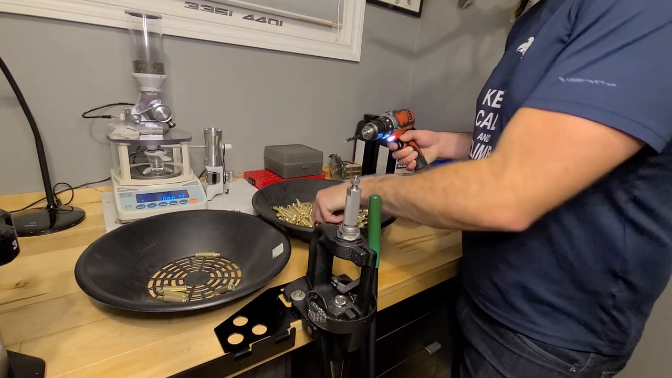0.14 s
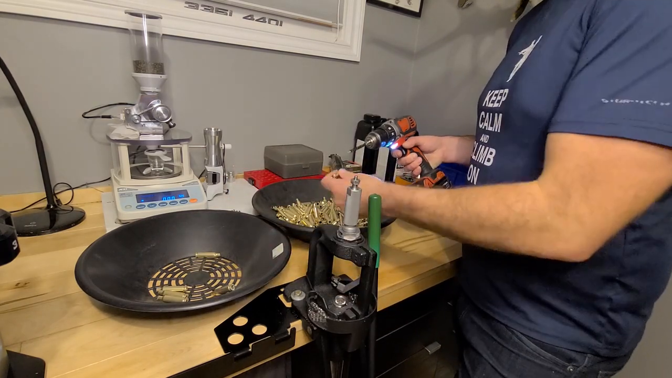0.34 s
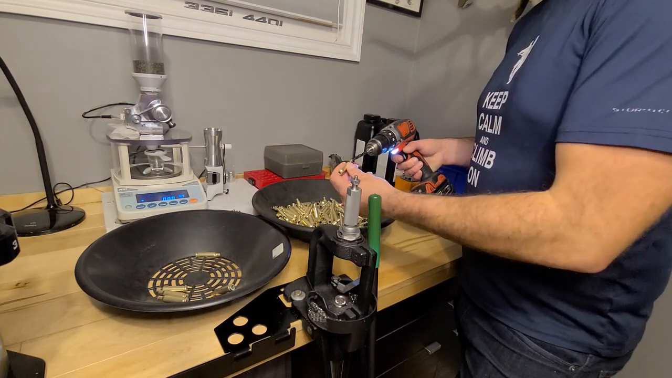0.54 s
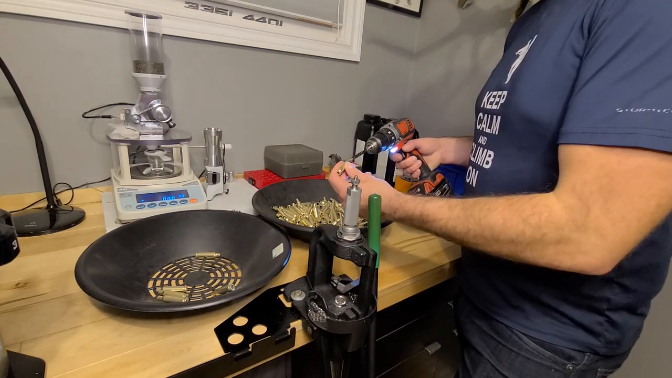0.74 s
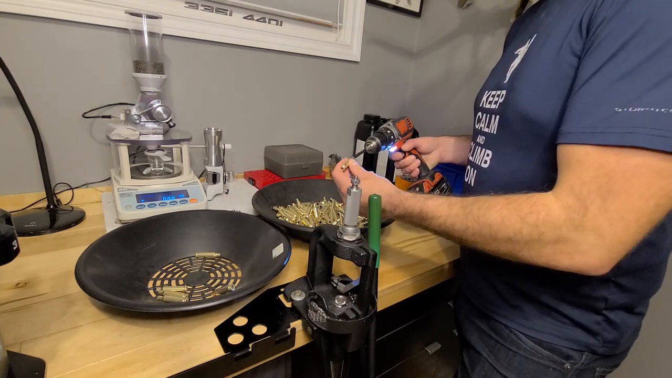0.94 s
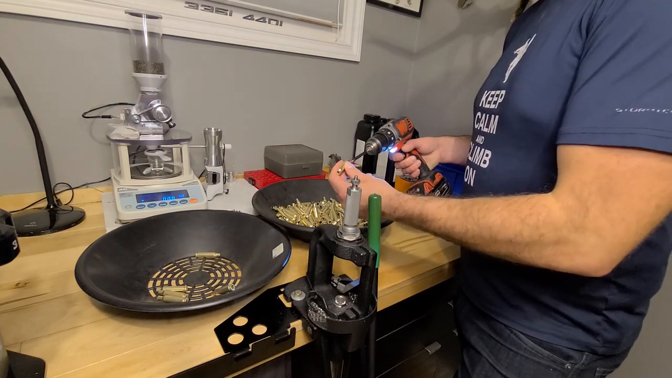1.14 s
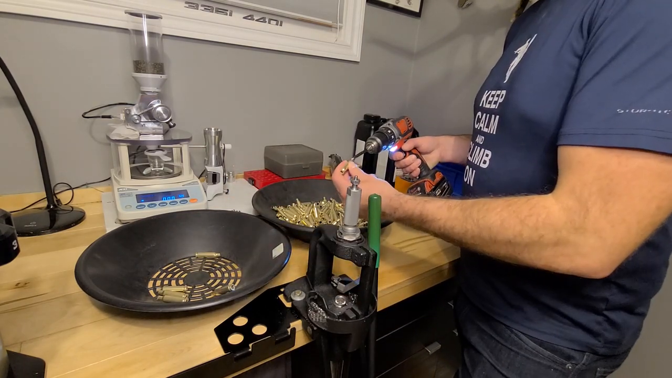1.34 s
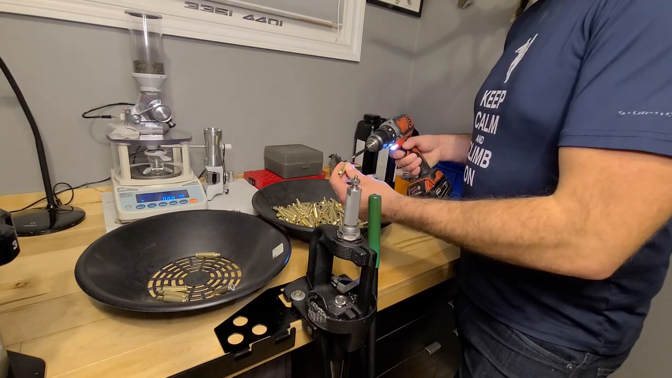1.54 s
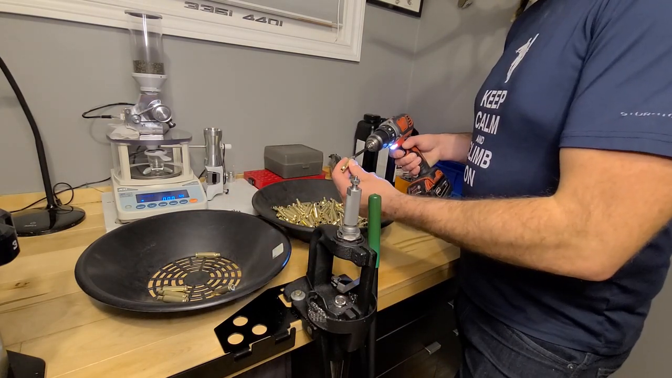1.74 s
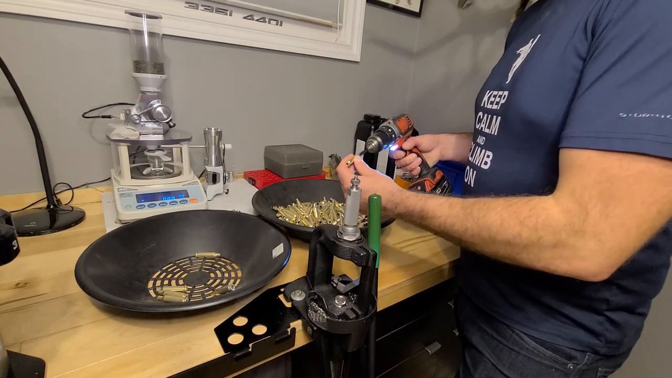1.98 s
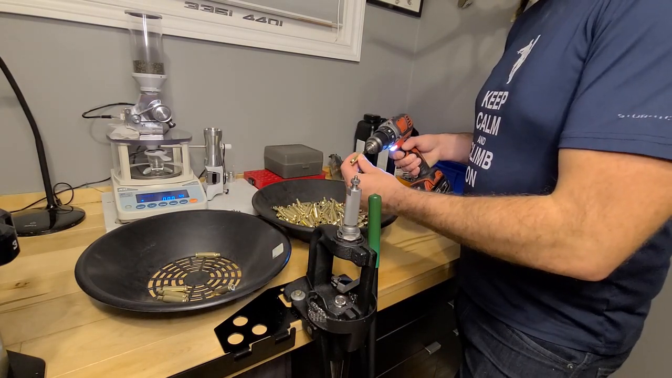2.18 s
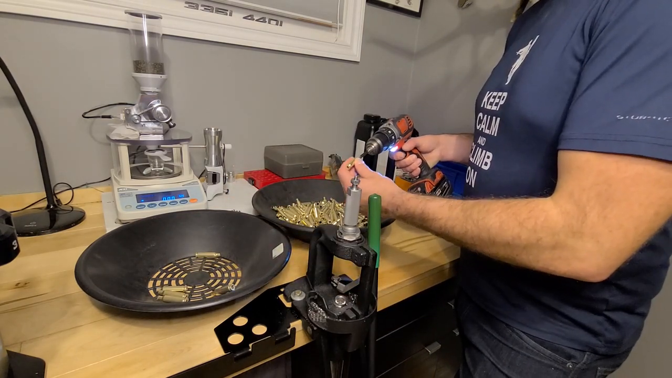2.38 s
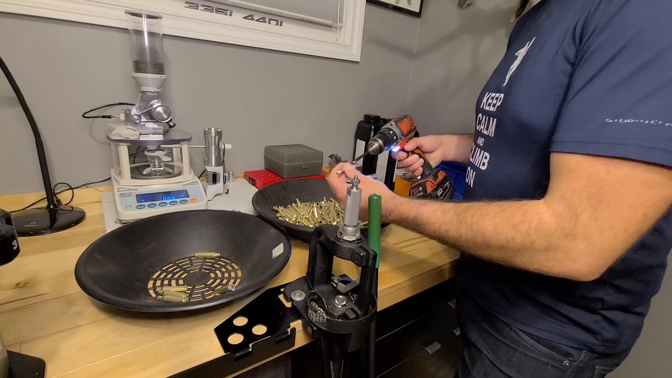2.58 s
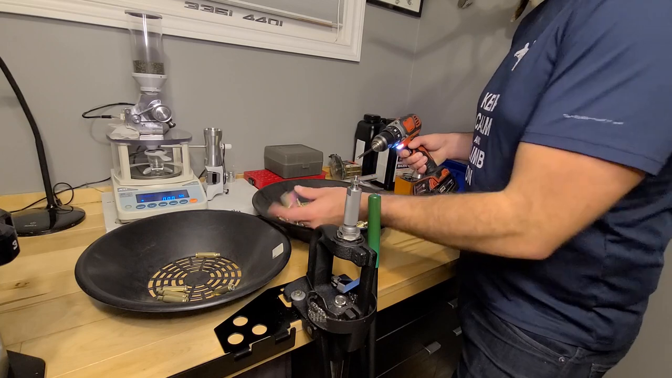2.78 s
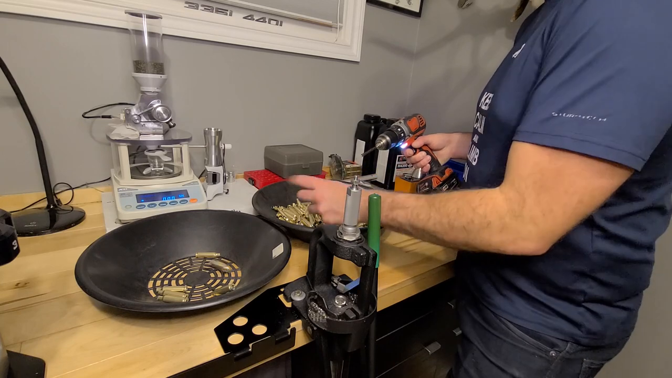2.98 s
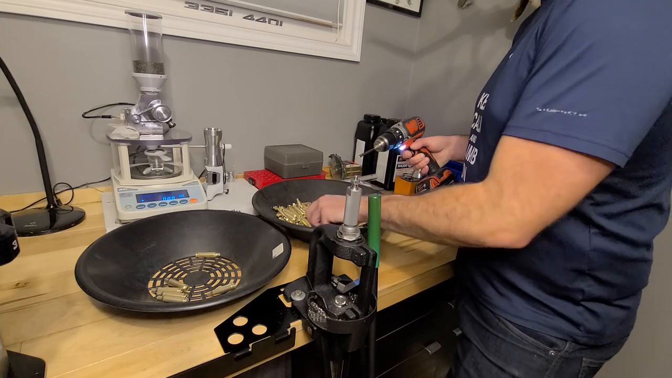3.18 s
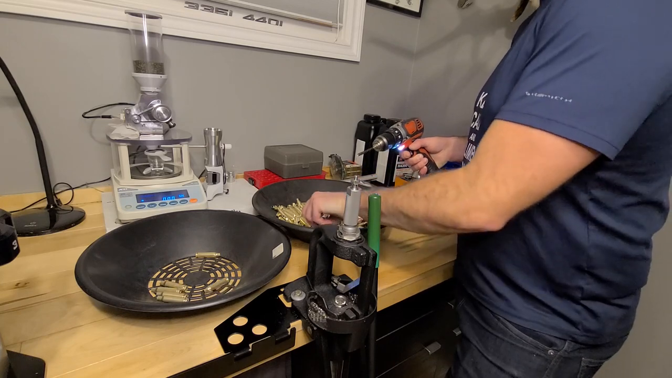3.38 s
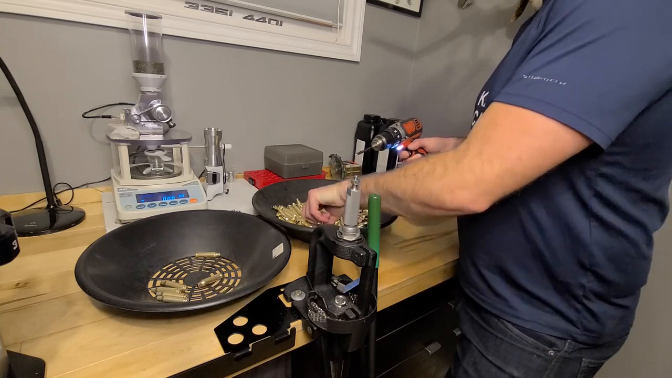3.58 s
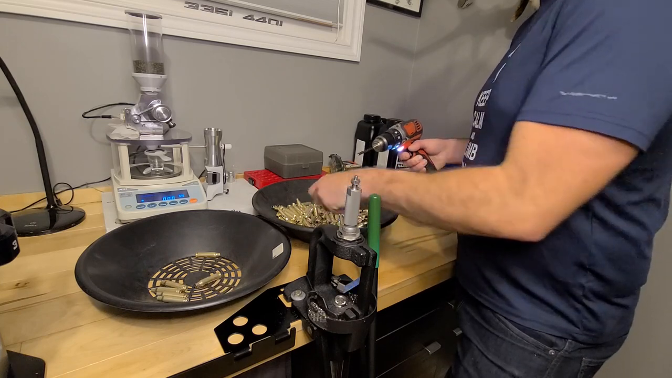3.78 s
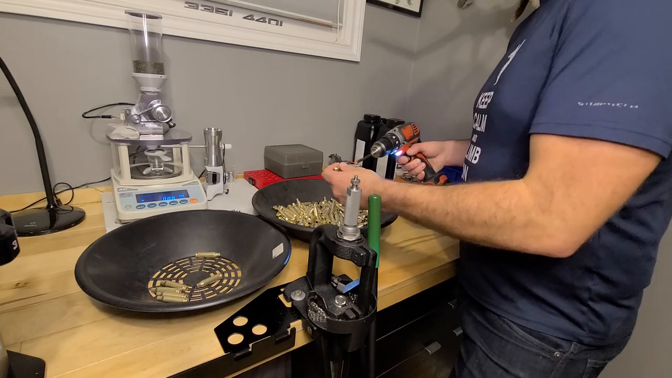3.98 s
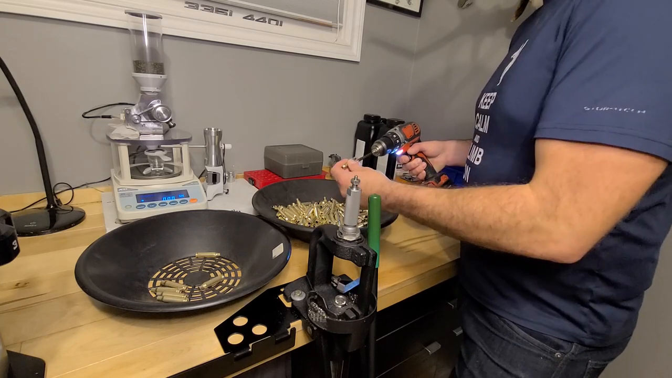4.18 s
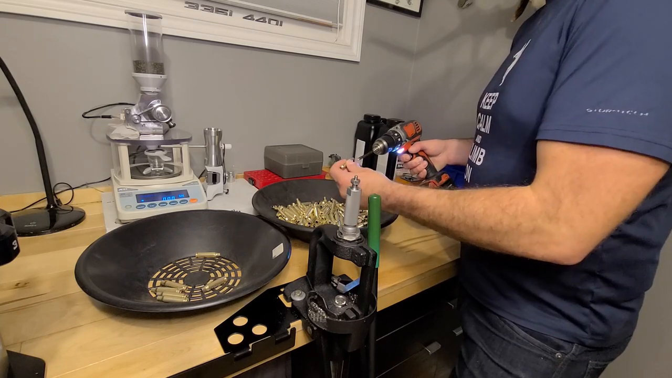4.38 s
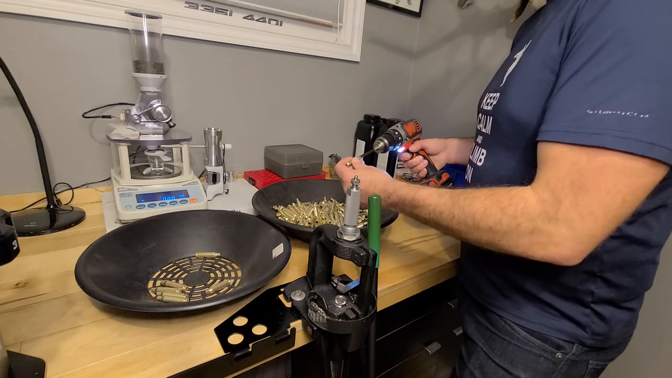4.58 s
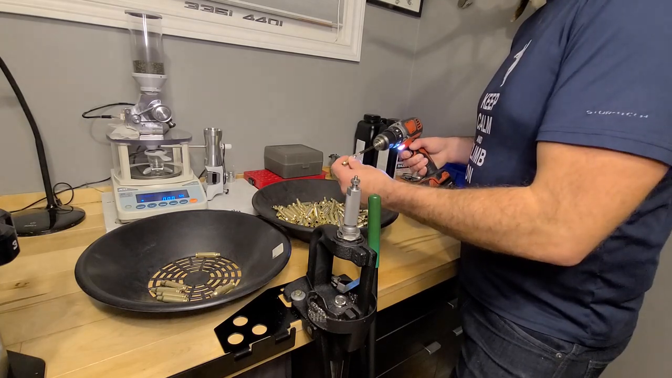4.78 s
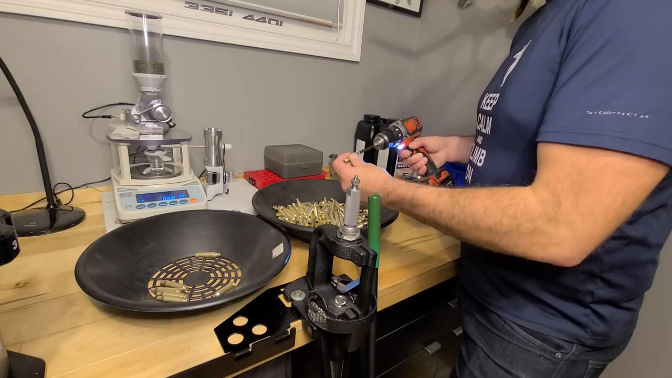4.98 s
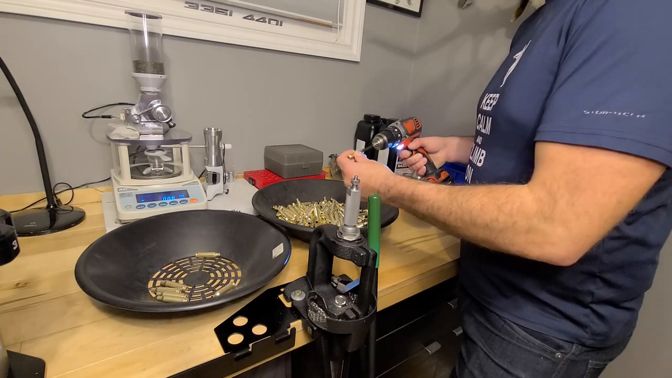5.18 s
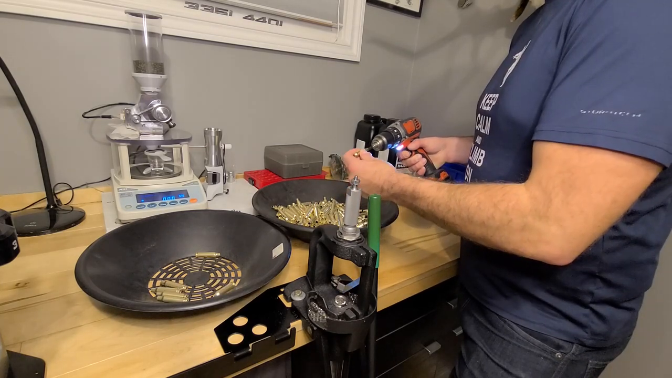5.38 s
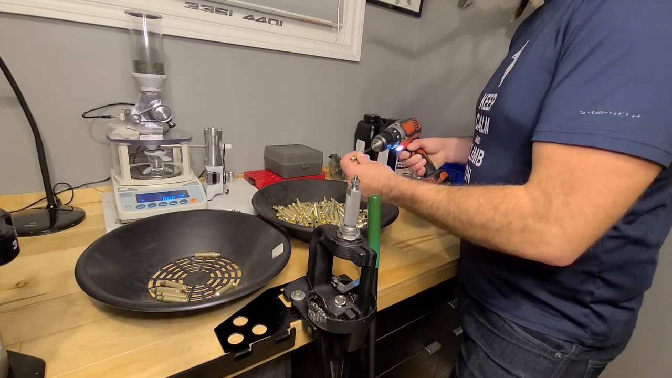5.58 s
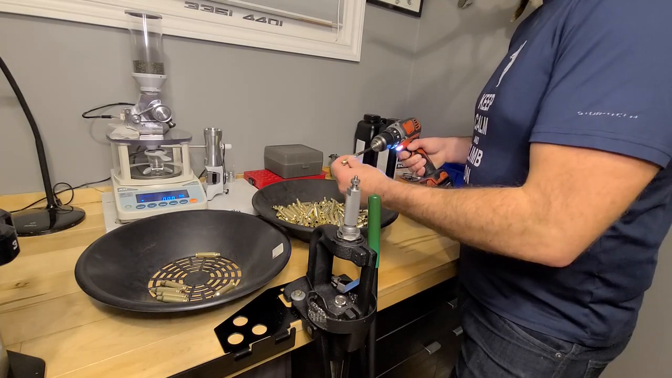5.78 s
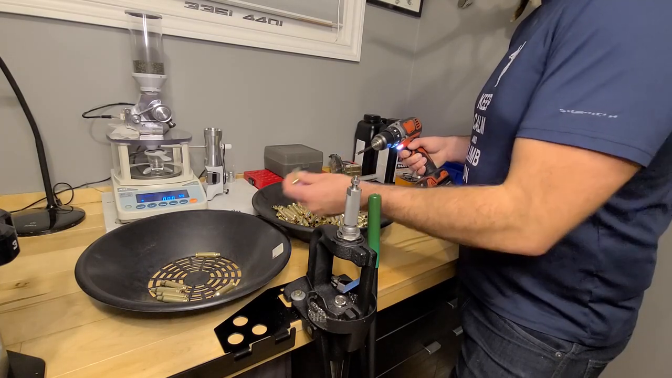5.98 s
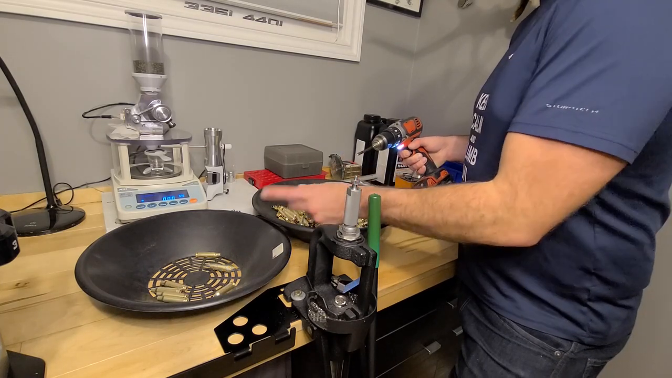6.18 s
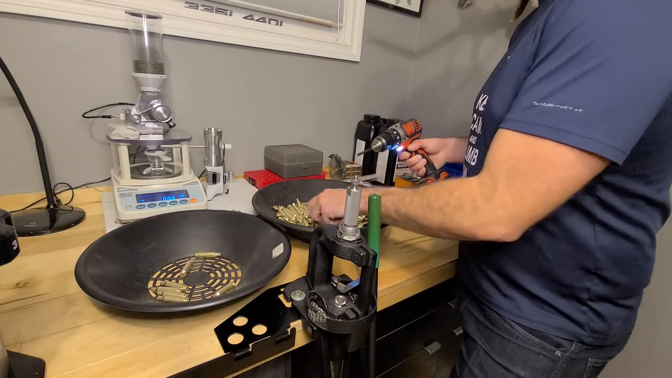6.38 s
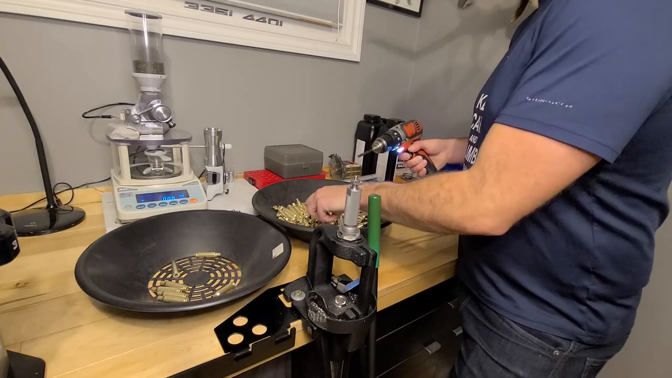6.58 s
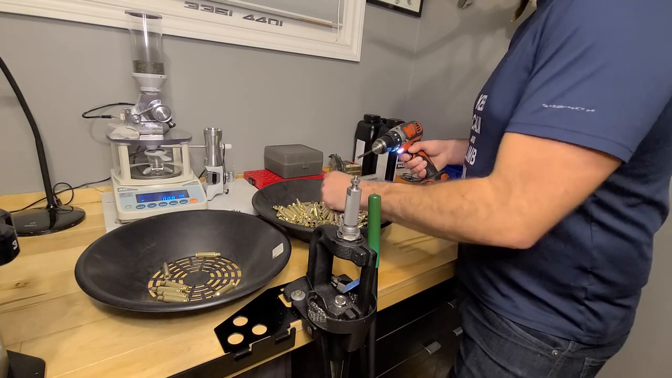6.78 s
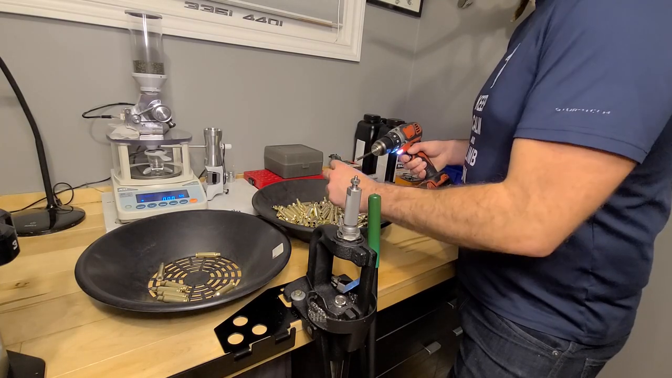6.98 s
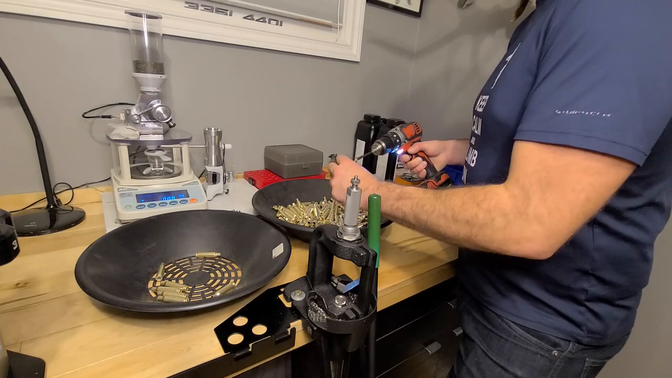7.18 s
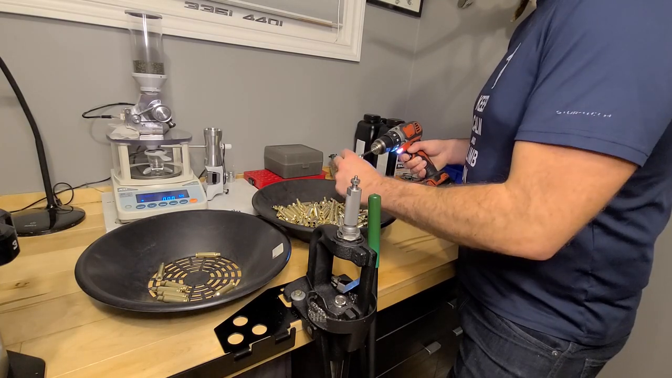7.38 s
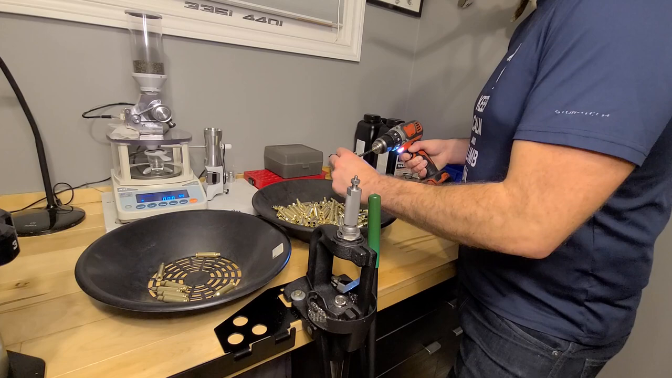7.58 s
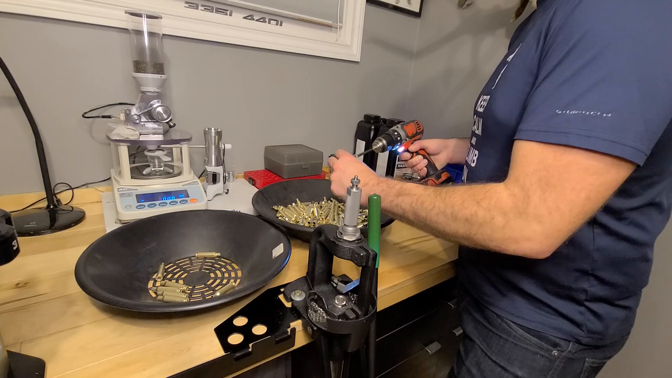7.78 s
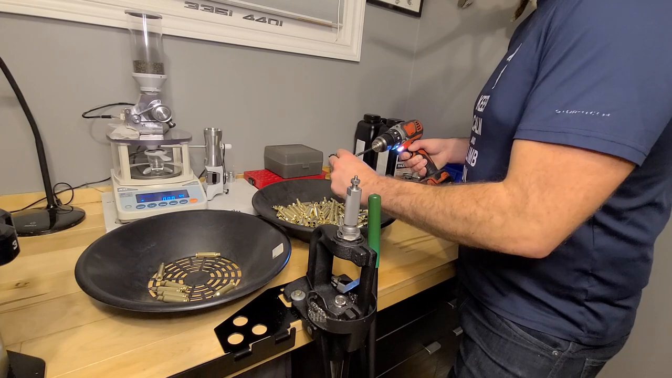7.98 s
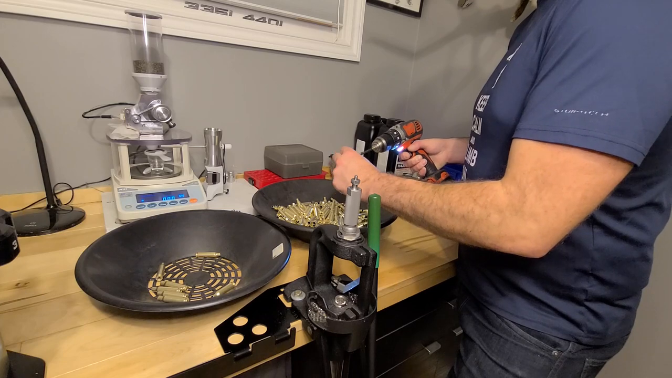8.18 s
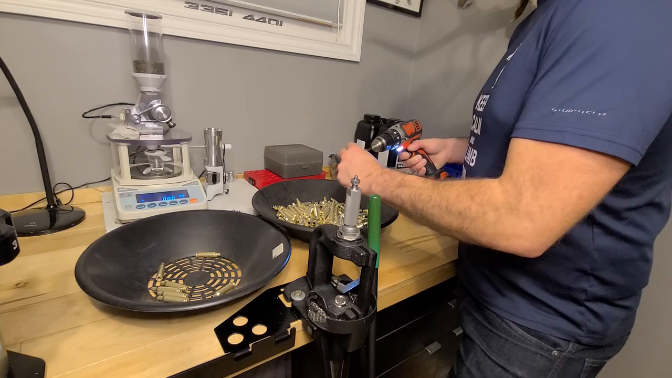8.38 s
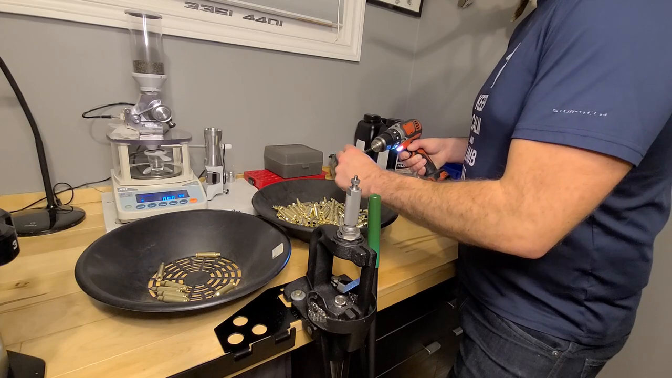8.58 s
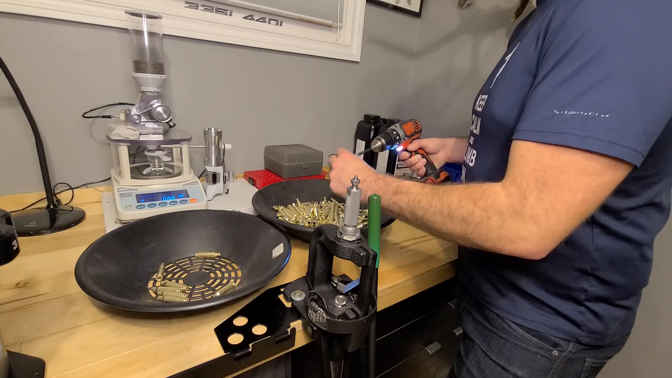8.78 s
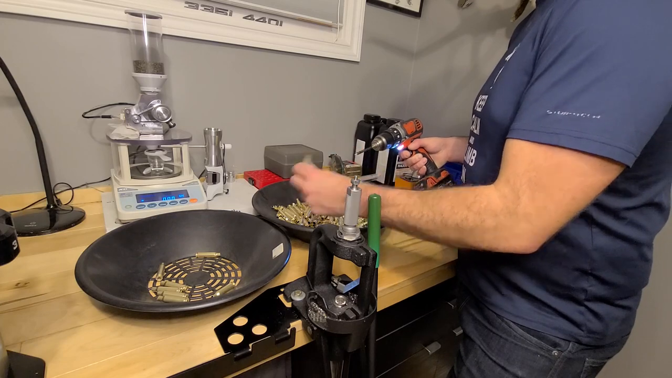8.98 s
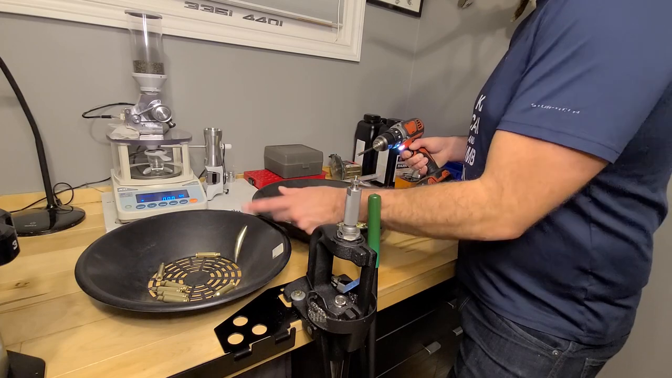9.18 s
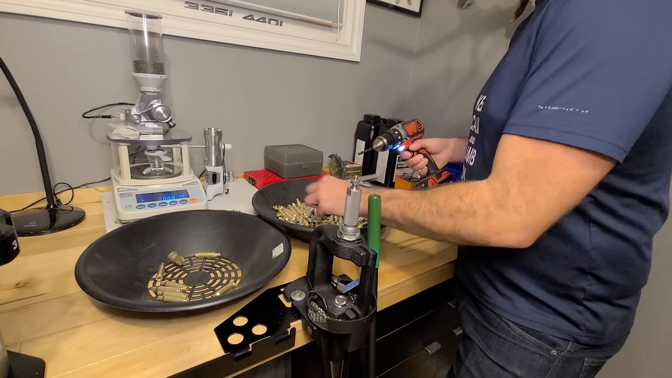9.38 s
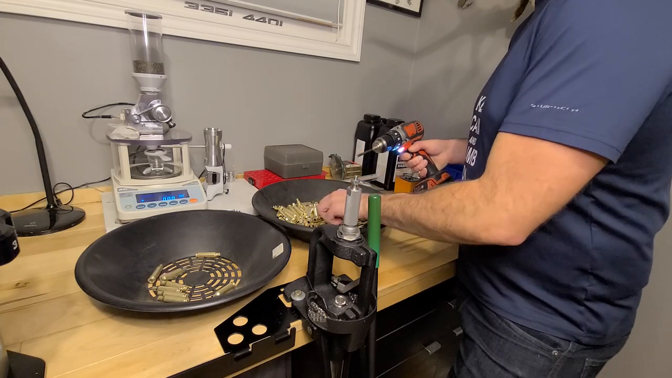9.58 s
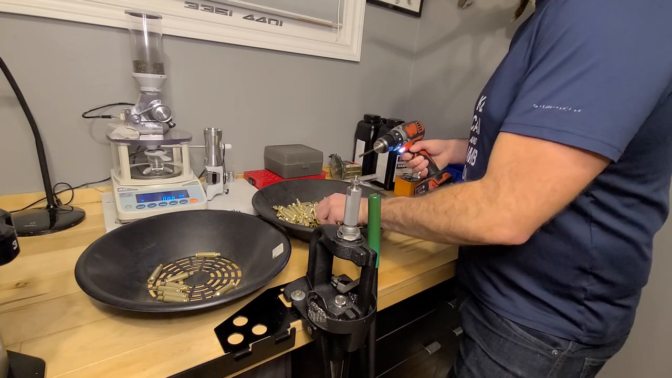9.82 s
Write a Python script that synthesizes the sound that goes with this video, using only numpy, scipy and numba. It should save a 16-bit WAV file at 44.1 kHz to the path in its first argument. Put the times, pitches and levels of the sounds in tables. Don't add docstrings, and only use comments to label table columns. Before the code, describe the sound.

Close stereo at a workbench in a small, fairly dry room. Loose brass cases rustle briefly, then a cordless drill a little left starts up, whining and hissing, gliding up and sagging. A case clanks and bounces in a thin metal pan to the right; fingers rummage among cases, the drill climbs again and settles into a steady whirr, with two more clattering drops and bench thumps.

```python
import sys
import numpy as np
from scipy import signal
from scipy.fft import rfft, irfft, next_fast_len
from scipy.io import wavfile
from scipy.ndimage import uniform_filter1d
from numba import njit

SR = 44100
rng = np.random.default_rng(int(sys.argv[2]) if len(sys.argv) > 2 else 0)


def put_to_file(sound):
    columns = np.atleast_2d(sound).T
    safe = np.clip(columns, -1, 1)
    whole_steps = np.round(safe * 32767)
    wavfile.write(sys.argv[1], SR, whole_steps.astype(np.int16))


def linear_from_db(decibels):
    return 10 ** (np.asarray(decibels, float) / 20)


N = 434368

WIDE_FROM_HZ, WIDE_TO_HZ = 650, 7800
BITE_S = 0.99
ORDERS_TOP_HZ = 16000


def level(x, db):
    return x * linear_from_db(db) / np.sqrt(np.mean(x ** 2))


def colour(x, points):
    point_hz, db = np.transpose(points)
    size = next_fast_len(N)
    hz = np.maximum(np.arange(size // 2 + 1) * SR / size, 1)
    gain = linear_from_db(np.interp(np.log(hz), np.log(point_hz), db))
    return irfft(rfft(x, size) * gain, size)[..., :N]


def walk(rate_hz):
    hold = int(SR / rate_hz)
    steps = np.repeat(rng.standard_normal(N // hold + 1), hold)
    return 1.416 * uniform_filter1d(uniform_filter1d(steps, hold), hold)[:N]


def swell(start_s, hold_s, db, rise_db_s, fall_db_s):
    t = np.arange(N) / SR - start_s
    rise_db = rise_db_s * np.maximum(-t, 0)
    fall_db = fall_db_s * np.maximum(t - hold_s, 0)
    return linear_from_db(np.maximum(db - rise_db - fall_db, -200))


def two_sides(mid, side):
    side = signal.lfilter(*signal.butter(1, WIDE_FROM_HZ, "high", fs=SR), side)
    return np.array([mid + side, mid - side])


def room(x, wet, delay):
    t60_s = 0.3
    t = np.arange(SR // 3) / SR
    mid, side = rng.standard_normal((2, len(t))) * linear_from_db(-60 * t / t60_s) * (t > .002)
    tail = two_sides(mid, side)
    tail *= np.sqrt(wet / np.mean(np.sum(tail ** 2, axis=1)))
    tail[0, 0] = tail[1, delay] = np.sqrt(1 - wet)
    return signal.oaconvolve(x[None], tail, axes=1)[:, :N]


def hush():
    # (frequency [Hz], density [dB per Hz])
    air = [(18, -44), (30, -28), (98, -5), (117, -6), (130, -12), (220, -10), (293, -3), (381, -12),
           (482, -4.5), (904, -18), (1090, -13), (1370, -19.5), (6110, -27), (8160, -32), (15700, -50)]
    mid, side = colour(rng.standard_normal((2, N)), air)
    return level(two_sides(mid, side), -65)


def bench():
    # (time [s], thump [dB], slow sway [dB])
    bumps = [(.03, -64, -62), (2.81, -47, -35), (3.0, -43, -52), (3.25, -45, -47), (3.48, -51, -64),
             (3.74, -55, -66), (4.82, -57, -85), (5.9, -61, -72), (6.195, -34.5, -46), (6.38, -51, -53),
             (6.68, -63, -68), (9.244, -37.5, -39), (9.36, -55, -54), (9.478, -40, -54),
             (9.646, -49.5, -56)]
    top = [(50, -20), (100, -0.5), (200, -2), (330, -3), (600, -33)]
    legs = [(25, -28), (50, -2), (80, -4), (130, -22)]
    thump = level(colour(rng.standard_normal(N), top), 0)
    sway = level(colour(rng.standard_normal(N), legs), 0)
    out = np.zeros(N)
    for s, thump_db, sway_db in bumps:
        bump = thump + linear_from_db(sway_db - thump_db) * sway
        out += bump * swell(s, 0.011, thump_db, rise_db_s=244, fall_db_s=158)
    return out


def rummage():
    # (time [s], peak
    # [dB], dull knock above it [dB])
    shoves = [(0.0, -28.5, -8.5), (0.0678, -33, -30), (0.0942, -36, -23), (0.1048, -31.5, -15),
              (0.1194, -48, 2), (0.5294, -60, -23), (0.6894, -71, -9), (0.8896, -60.5, 1),
              (3.4025, -24, -4), (3.4603, -18.5, -9.5), (3.4797, -21, -10), (3.541, -28, -17),
              (3.6524, -18, -15), (3.6694, -25, -20), (3.742, -26, -10), (3.9491, -30, -9)]
    clink_tone = [(120, -45), (500, 6), (1500, 8.5), (3200, 3.5), (6000, -4.5), (9000, -13),
                  (11500, -4), (15000, -18)]
    clinks, knocks = np.zeros((2, N + SR))
    t = np.arange(SR // 5) / SR
    for s, db, knock_db in shoves:
        clicks = rng.standard_normal(len(t)) * linear_from_db(2.1 * rng.exponential(size=len(t)))
        knock = rng.standard_normal(len(t))
        i = int(s * SR)
        clinks[i:i + len(t)] += linear_from_db(db - 6.0) * clicks * linear_from_db(-60 * t / 0.1)
        knocks[i:i + len(t)] += linear_from_db(db + knock_db + 16.0) * knock * linear_from_db(-60 * t / 0.093)
    dull = signal.lfilter(*signal.butter(2, (300, 1000), "band", fs=SR), knocks[:N])
    return colour(clinks[:N], clink_tone) + dull


def brass():
    # (time [s], length [s], level [dB], frequency [Hz])
    rings = [
        (0.0, .02, -54, 11350),
        (.114, .004, -58, 11600),
        (.13, .008, -57, 11432),
        (3.126, 0.079, -33, 11440),
        (9.446, 0.039, -21, 11450),
        (9.513, 0.054, -20, 11480),
        (9.6, 0.11, -41, 11560),
        (9.806, 0.0049, -32, 11300),
    ]
    t = np.arange(N) / SR
    drift = np.cumsum(12 * walk(70)) / SR
    out = np.zeros(N)
    for s, hold_s, db, hz in rings:
        tone = np.sin(2 * np.pi * (hz * t + drift))
        out += swell(s, hold_s, db, rise_db_s=1500, fall_db_s=600) * tone
    return out * linear_from_db(7 + 1.8 * walk(90))


def drops():
    # (time [s], peak [dB], loudest pan mode [Hz])
    landings = [(2.8926, -7, 1140), (2.909, -5.5, 820), (2.929, -15, 714), (2.959, -12.5, 579),
                (3.029, -22.5, 659), (3.071, -18.5, 780), (2.899, -23, 1010), (3.157, -19.5, 710),
                (3.322, -25, 585), (4.786, -29, 603), (6.117, -23.5, 830), (6.144, -21, 490),
                (6.161, -6, 1120), (6.168, -8, 910), (6.179, -23, 2700), (6.199, -13.5, 576.5),
                (6.229, -27, 1159), (6.298, -18, 580), (6.381, -21.5, 750), (9.221, -7.5, 571),
                (9.239, -17, 773), (9.256, -18, 748), (9.3063, -7.5, 720), (9.319, -20.5, 563),
                (9.417, -22, 789), (9.443, -12, 571), (9.498, -14, 810), (9.518, -15, 561.6),
                (9.558, -17, 576), (9.599, -19.5, 700)]
    # (frequency [Hz], level [dB], t60 [s])
    pan = [(312, -5.5, 0.041), (465, 3, 0.015), (571, -5.5, 0.058), (697, 1, 0.023), (790, -2, 0.065),
           (918, -12.5, 0.041), (1008, -8, 0.041), (1130, -1.5, 0.059), (1300, -1.5, 0.033),
           (1373, 1.5, 0.015), (1527, -2.5, 0.037), (1777, -1.5, 0.027), (2007, -5.5, 0.022),
           (2250, -14.5, 0.089), (2366, -10.5, 0.03), (2600, -3, 0.03), (3136, -9.5, 0.03)]
    out, t = np.zeros(N + SR), np.arange(SR // 8) / SR
    hz, mode_db, t60_s = np.transpose(pan)[:, :, None]
    octaves = np.log2(hz / 800)
    for s, db, spot_hz in landings:
        spread, detune = rng.standard_normal((2, len(pan), 1))
        blow = .16 * rng.standard_normal(500) * np.exp(-t[:500] / .0035)
        blow[0] = 1
        bright_db = 0.5 + 18.5 * min(np.log2(spot_hz / 800), .7)
        spot_db = 5.0 * np.exp(-(np.log2(hz / spot_hz) / .15) ** 2)
        gain = linear_from_db(mode_db + spot_db + 1.5 * spread + bright_db * np.clip(octaves, 0, 1))
        modes = np.sin(2 * np.pi * hz * (1 + .012 * detune) * t + .7 * spread)
        ring = np.sum(gain * linear_from_db(-60 * t / t60_s) * modes, axis=0)
        ring = ring * (1 - np.exp(-t / .0008))
        ring = signal.fftconvolve(ring, blow)[:len(t)]
        i = int(s * SR)
        out[i:i + len(t)] += linear_from_db(db + 4.0) * ring / np.max(np.abs(ring))
    return signal.sosfilt(signal.butter(3, 420, "high", fs=SR, output="sos"), out[:N])


def switching():
    # (frequency [Hz], level [dB], rise [s])
    controller = [
        (7832, -65, .04),
        (15665, -44, .2),
    ]
    start_s = .845
    t = np.arange(N) / SR
    out = np.zeros(N)
    for hz, db, rise_s in controller:
        fade = np.clip((t - start_s) / rise_s, 0, 1) ** 2
        out += linear_from_db(db) * np.sin(2 * np.pi * hz * t + .6 * walk(15)) * fade
    return out * linear_from_db(1.6 * walk(12))


def shaft_speed():
    # (time [s], shaft speed aimed at [Hz], lag of the rotor [s])
    trigger = [(0.76, 400, 1.2), (1.13, 179, .42), (1.945, 400, .38), (2.1, 312, .315), (2.79, 200, .42),
               (2.9, 20, 1.75), (3.76, 161.8, .23), (5.19, 350, .44), (5.35, 296, .33), (6.12, 266.2, .6),
               (7.0, 264, 1.7), (8.95, 267.3, .3)]
    t, hz, now = np.arange(N) / SR, np.zeros(N), 0.
    ends = [s for s, _, _ in trigger[1:]] + [N / SR]
    for (s, aim, lag), end in zip(trigger, ends):
        hz = np.where(t >= s, aim + (now - aim) * np.exp(-np.maximum(t - s, 0) / lag), hz)
        now = aim + (now - aim) * np.exp(-(end - s) / lag)
    return uniform_filter1d(np.maximum(hz, 30), size=1301)


@njit
def orders(turns, hz, weight, top_hz):
    y = np.zeros(len(turns))
    for i in range(len(turns)):
        z = np.exp(2j * np.pi * turns[i])
        w = z
        for k in range(min(len(weight), int(top_hz / hz[i]))):
            y[i] += (w * weight[k]).imag
            w *= z
    return y


def worn_teeth(turns, hz):
    uneven, phase = rng.standard_normal((2, 100))
    weight = np.clip(np.arange(100) / 6, .1, 1) * linear_from_db(1.5 + 2.4 * uneven) * np.exp(3j * phase)
    count = np.minimum(ORDERS_TOP_HZ / hz, 100)
    return orders(turns, hz, weight, float(ORDERS_TOP_HZ)) / np.sqrt(count)


def gear_rush(teeth, cold_db):
    # (frequency [Hz], density [dB per Hz])
    casing = [(71, -66), (120, -35.5), (499, -11), (641, -9.5), (808, -8), (899, -8.5), (1060, -5),
              (1330, -1), (1510, -3.5), (1620, -7.5), (1740, -6.5), (2670, -1), (4470, -2.5), (5740, 0.5),
              (8500, -8), (11000, -6), (18700, -120)]
    gear = level(colour(rng.standard_normal(N) + linear_from_db(-10.0) * teeth, casing), 4.85)
    treble = colour(gear, [(4000, -39), (7500, -2)])
    return gear + (linear_from_db(0.84 * cold_db) - 1) * treble


def brush_fizz(turns, teeth):
    # (frequency [Hz], density [dB per Hz])
    hiss = [(3000, -30), (7000, -10), (9000, -4), (11000, -1.5), (13000, 0), (14500, -1), (16000, -2)]
    spark = 1 + 0.59 * np.cos(2 * np.pi * 5 * turns)
    return level(colour(spark * rng.standard_normal(N) + linear_from_db(0.5) * teeth, hiss), 3.14)


def shaft_hum(turns, hz):
    # (multiple of shaft speed [1], level above gear noise [dB])
    strong = [(1, -15), (3, -9), (5, -21), (6, -21), (8, -22), (14, -33), (20, -23), (25, -22), (30, -26),
              (35, -23), (40, -24)]
    # (frequency [Hz], gain [dB])
    housing = [(60, -50), (170, -20), (230, -15), (300, -2), (420, -5.5), (600, -5.5), (850, -9.5),
               (1150, 8), (1600, 3.5), (2500, 10), (4100, 21), (5500, 11), (9000, 10.5), (12000, 11.5)]
    weight = np.zeros(40, complex)
    for k, db in strong:
        weight[int(k) - 1] = linear_from_db(db) * np.exp(1j * rng.standard_normal())
    hum = orders(turns, hz, weight, float(ORDERS_TOP_HZ))
    return colour(hum * (hz / 235) ** 1.16, housing)


def singing(turns, hz, torque, bite_db):
    # (time [s], commutator [dB], pinion [dB], wobble of the brush [dB])
    effort = [(.9, -7, -30, -40), (1.3, -19, -14.5, -24), (1.93, -1, -5.5, -4), (2.3, -4, -1.5, 3),
              (2.75, 2.5, -1, 9.5), (3.05, -1, -6.5, 1.5), (3.8, -8.5, -1, -5.5), (4.7, -3, -17, -12.5),
              (5.3, -3.5, -5, -4), (5.8, 0, -2, 4.5), (6.8, -20, -8, 0), (7.1, -16, -13, 7.5),
              (7.22, -18, -19, 3), (7.34, 0.5, 0, 1.5), (8.12, 1, -1.5, -9), (8.6, -3, 3, -15),
              (9.2, -2.5, -5, -6), (9.55, -3.5, 1.5, 8)]
    # (multiple of shaft speed [1], part [column of effort after time], level [dB])
    singers = [
        (10, 0, -32),
        (15, 1, -31),
        (4, 2, -36),
        (2, 2, -40),
    ]
    # (frequency [Hz], width [Hz], level [dB])
    gearcase = [(592, 20, -6), (1240, 87, -7), (1700, 210, -12.5), (2230, 190, 1), (2674, 37, 0),
                (3100, 110, -3.5), (3370, 210, -10), (4170, 800, 3.5), (4580, 150, -5)]
    floor_db = -16.5
    s, *columns = np.transpose(effort)
    parts_db = [np.interp(np.arange(N) / SR, s, column) for column in columns]
    flutter_db = 1.0 + 2.2 * np.clip(np.abs(torque), 0, 1)
    whine = np.zeros(N)
    for k, part, db in singers:
        order_hz = k * hz[::64]
        power = linear_from_db(2 * floor_db)
        for centre, width, top_db in gearcase:
            power = power + linear_from_db(2 * top_db) / (1 + (2 * (order_hz - centre) / width) ** 2)
        ring = np.repeat(np.sqrt(2 * power), 64)[:N]
        gain = linear_from_db(db + parts_db[part] + bite_db + flutter_db * walk(28))
        whine += gain * ring * np.sin(2 * np.pi * k * turns)
    return whine


def drill():
    t, hz = np.arange(N) / SR, shaft_speed()
    torque = uniform_filter1d(np.gradient(hz) * SR / 100, size=4001)
    bite_db = -269 * np.maximum(BITE_S - t, 0)
    cruise_hz = 267
    gear_db = -29 + 6 * np.log2(hz / cruise_hz) + .5 * torque + bite_db
    cold_db = -15 * np.exp(-np.maximum(t - BITE_S, 0) / 0.58)
    fizz_db = -1 + 0.82 * cold_db - 0.44 * torque
    turns = np.cumsum(hz * (1 + 0.00016 * walk(30))) / SR
    teeth = worn_teeth(turns, hz)
    rush = gear_rush(teeth, cold_db) + linear_from_db(fizz_db) * brush_fizz(turns, teeth)
    gain = linear_from_db(gear_db + 0.75 * walk(9))
    whine = gain * shaft_hum(turns, hz) + singing(turns, hz, torque, bite_db)
    return gain * rush, whine


def scene():
    rush, whine = drill()
    tones = room(whine + switching(), .15, delay=1)
    tool = room(rush, .89, delay=7) + tones * linear_from_db(np.array([[2.4], [-3.6]]))
    pan = room(drops() + rummage(), .42, delay=0) + room(brass(), .12, delay=0) + bench()
    return tool + hush() + pan * linear_from_db(np.array([[-1.2], [1.2]]))


def top_cut(x):
    return signal.sosfilt(signal.butter(12, 16790, fs=SR, output="sos"), x)


def record(dry):
    # (frequency [Hz], gain [dB])
    treble_limit = [(100, 0), (15760, 0), (15900, -35), (16500, -90)]
    mid, side = (dry[0] + dry[1]) / 2, (dry[0] - dry[1]) / 2
    narrowing = [(100, 0), (WIDE_TO_HZ - 200, 0), (WIDE_TO_HZ + 200, -7), (10200, -8), (10800, -50)]
    wide = colour(side, narrowing)
    for hz in range(10500, 15500, 1250):
        band = signal.sosfilt(signal.butter(4, (hz, hz + 1250), "band", fs=SR, output="sos"), side)
        wide = wide + linear_from_db(-6.5) * band * np.clip(8 * walk(25), 0, 1)
    mix = colour(np.array([mid + wide, mid - wide]), treble_limit)
    mix = np.tanh(.7 * mix) / .7
    return top_cut(mix)


dry = scene()
out = record(dry)
put_to_file(out)
```